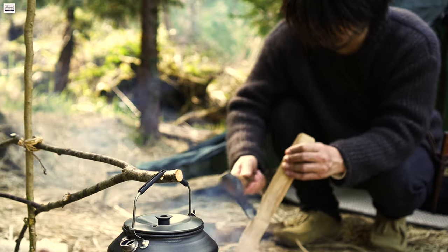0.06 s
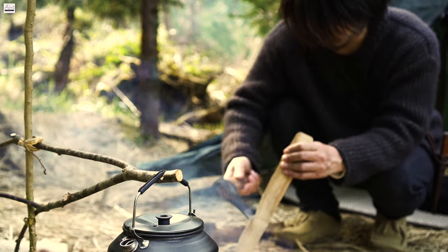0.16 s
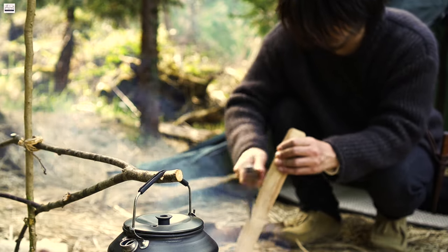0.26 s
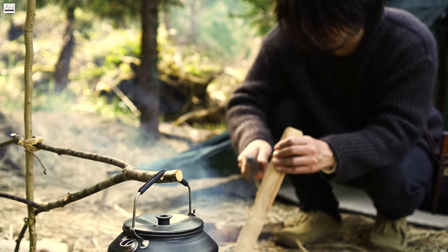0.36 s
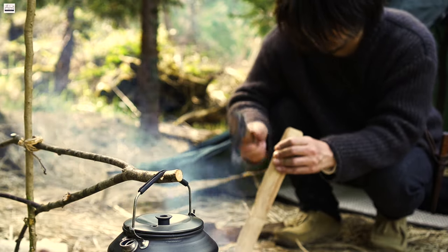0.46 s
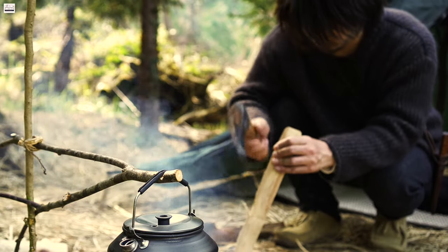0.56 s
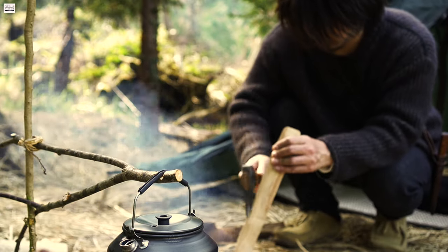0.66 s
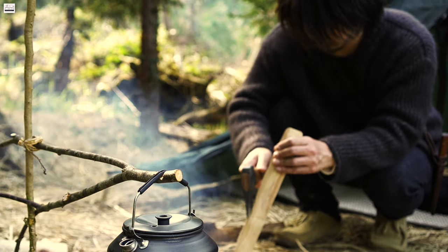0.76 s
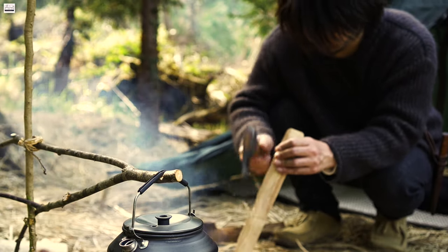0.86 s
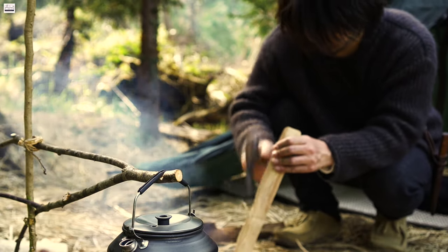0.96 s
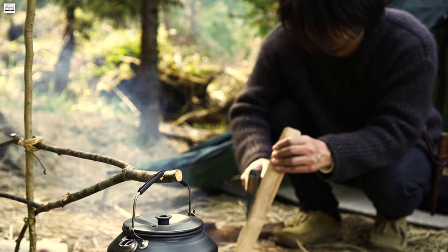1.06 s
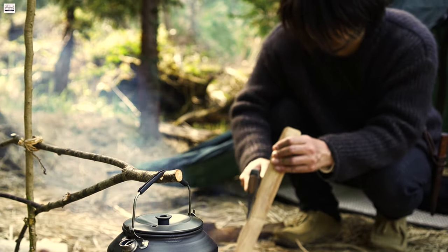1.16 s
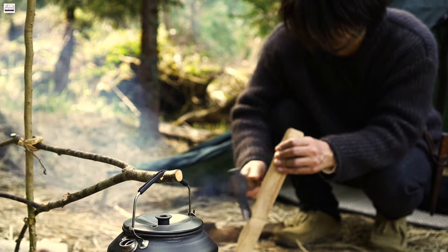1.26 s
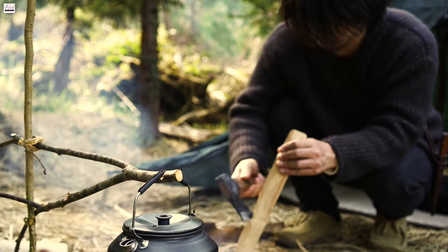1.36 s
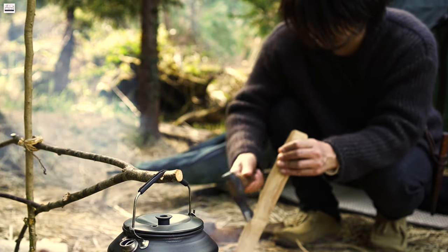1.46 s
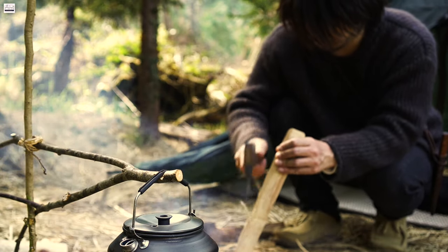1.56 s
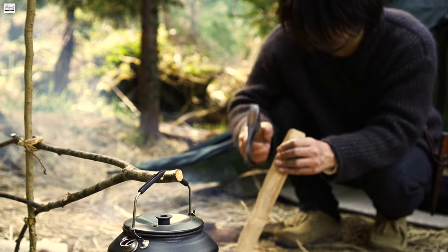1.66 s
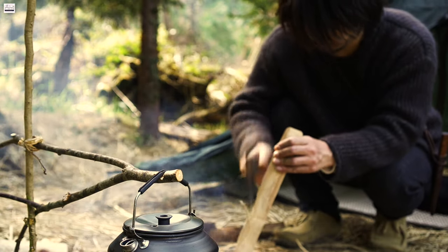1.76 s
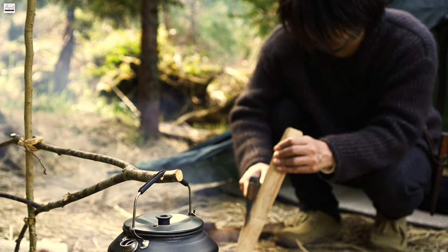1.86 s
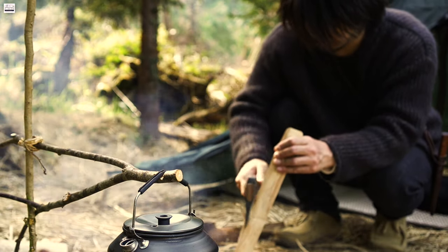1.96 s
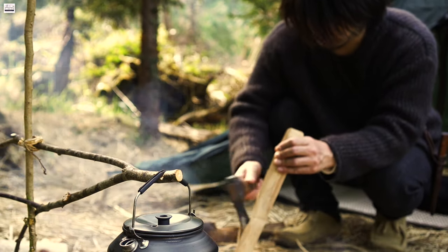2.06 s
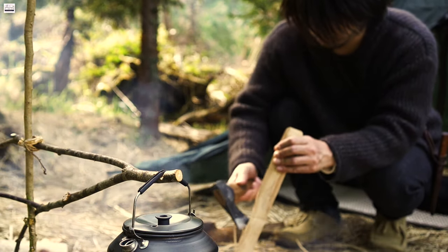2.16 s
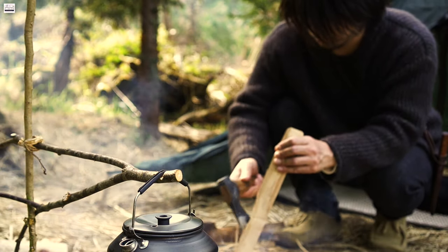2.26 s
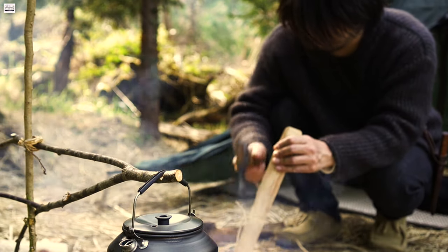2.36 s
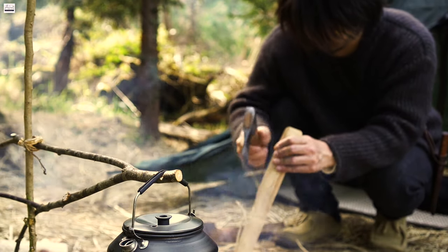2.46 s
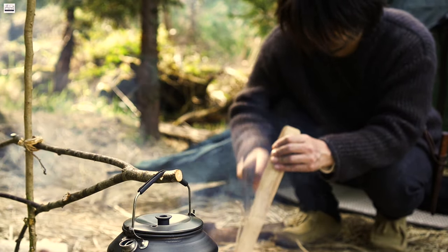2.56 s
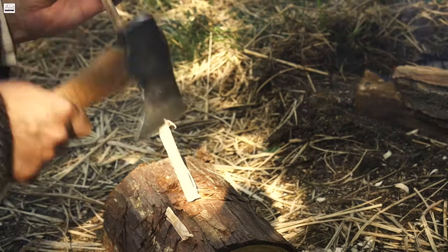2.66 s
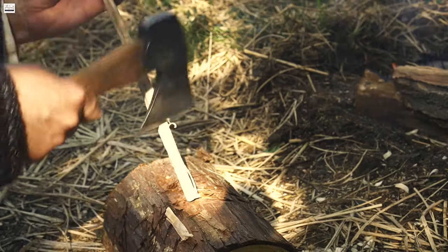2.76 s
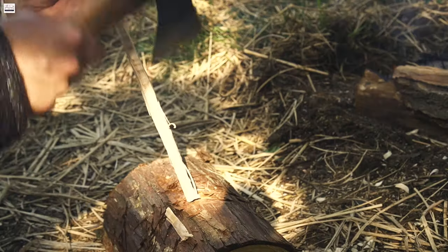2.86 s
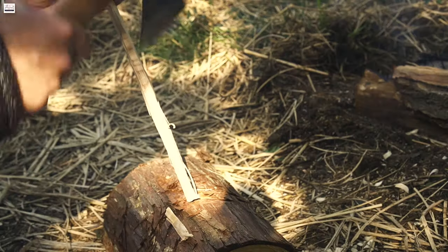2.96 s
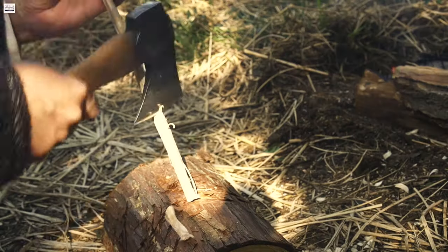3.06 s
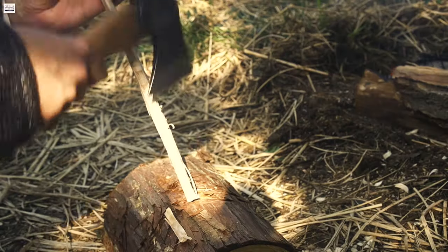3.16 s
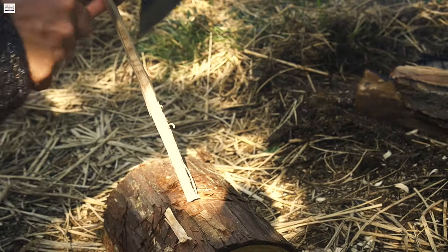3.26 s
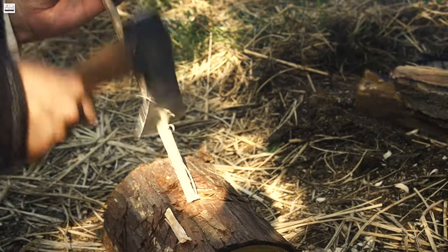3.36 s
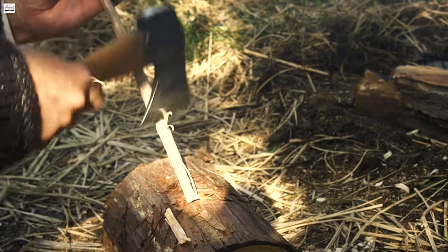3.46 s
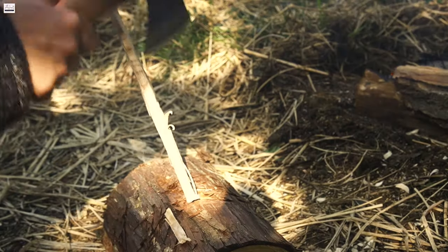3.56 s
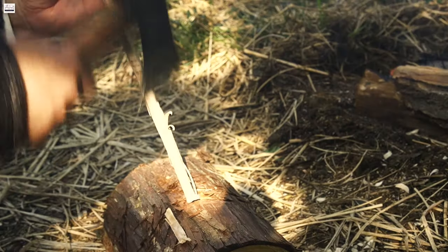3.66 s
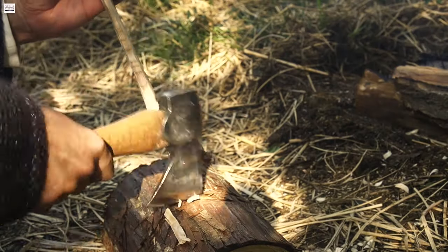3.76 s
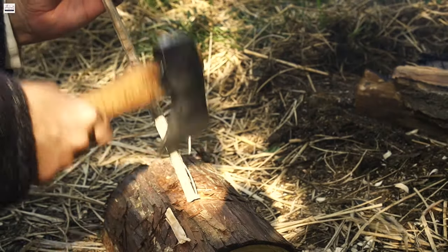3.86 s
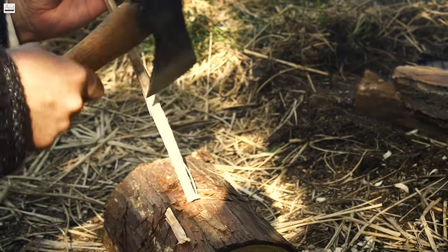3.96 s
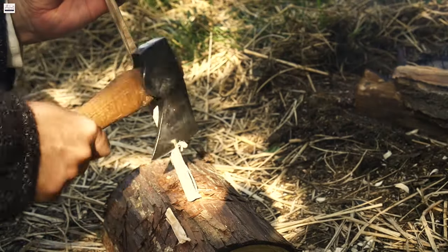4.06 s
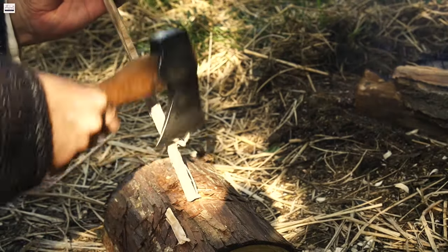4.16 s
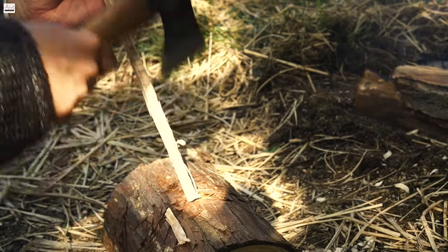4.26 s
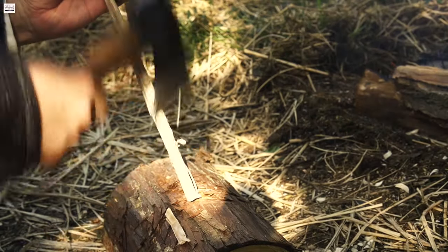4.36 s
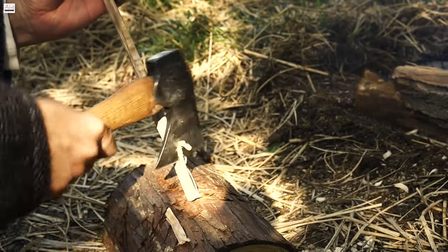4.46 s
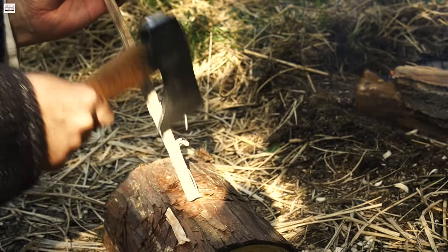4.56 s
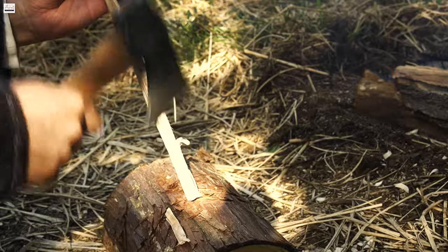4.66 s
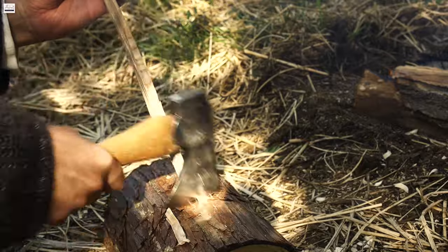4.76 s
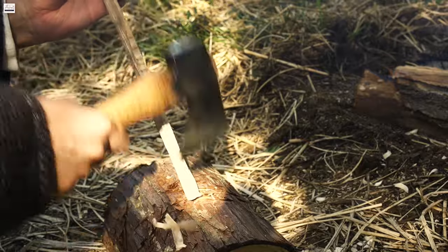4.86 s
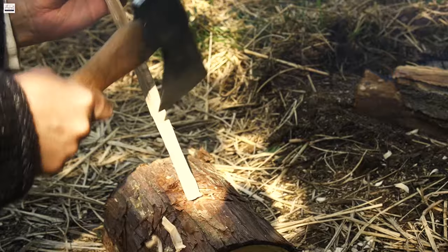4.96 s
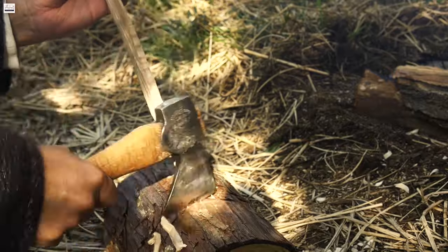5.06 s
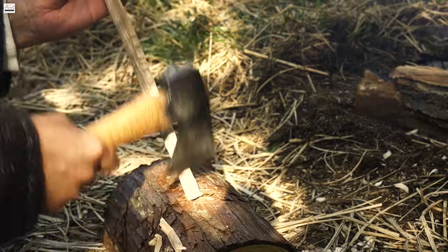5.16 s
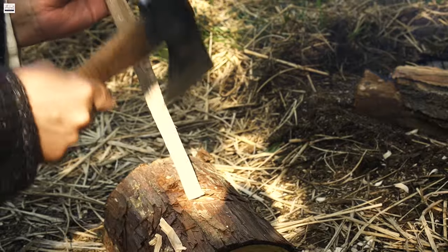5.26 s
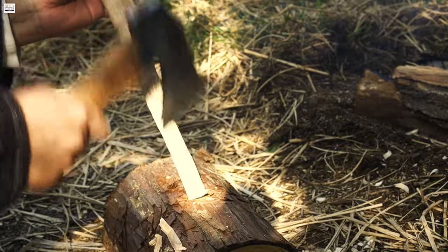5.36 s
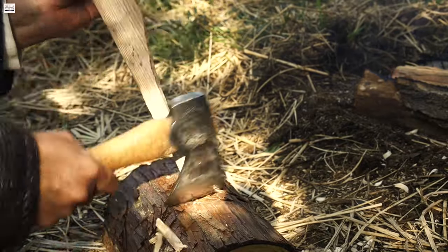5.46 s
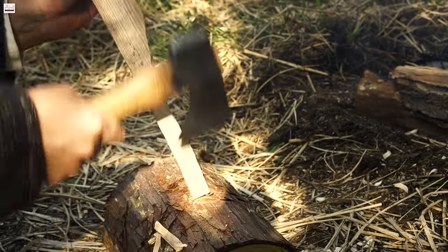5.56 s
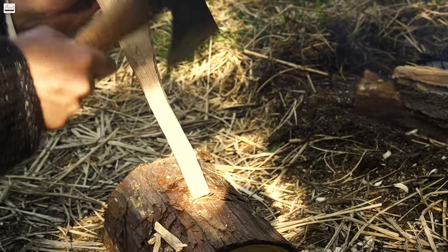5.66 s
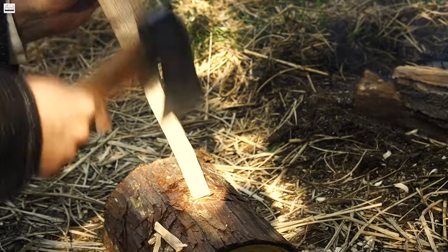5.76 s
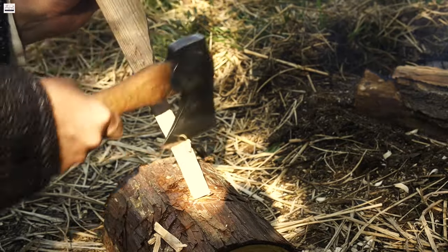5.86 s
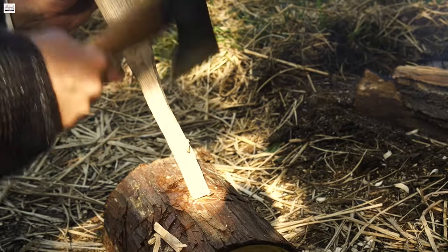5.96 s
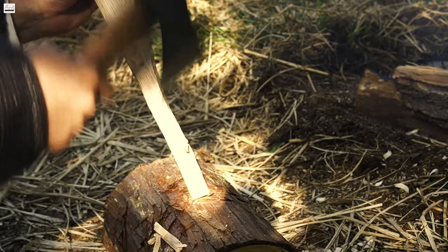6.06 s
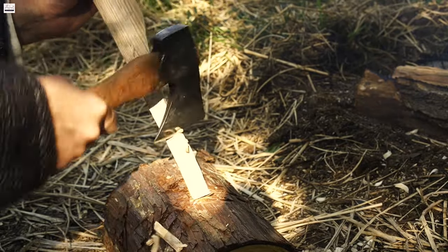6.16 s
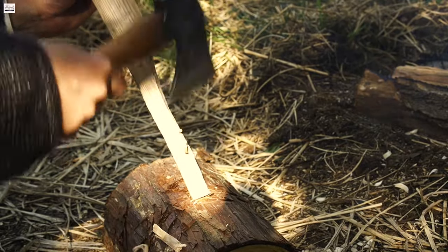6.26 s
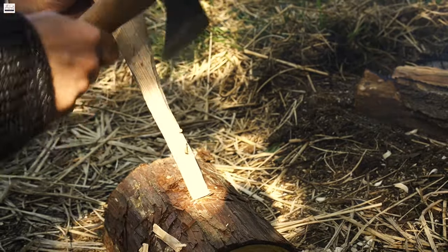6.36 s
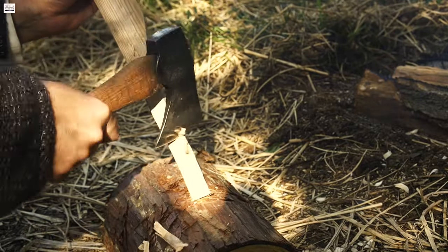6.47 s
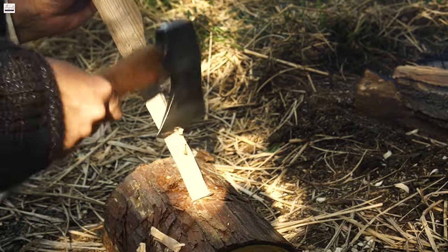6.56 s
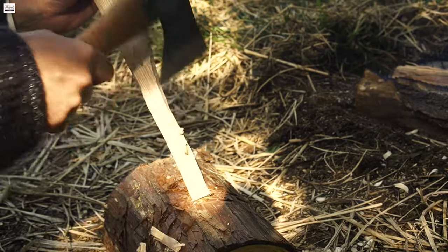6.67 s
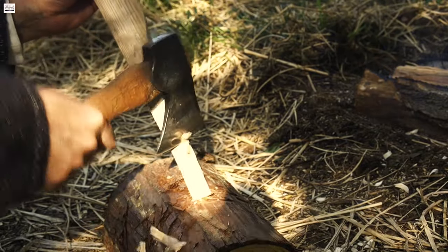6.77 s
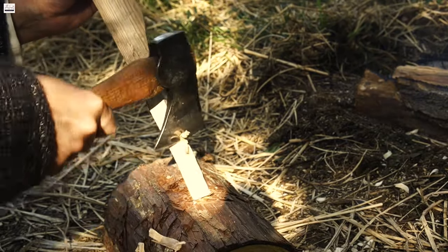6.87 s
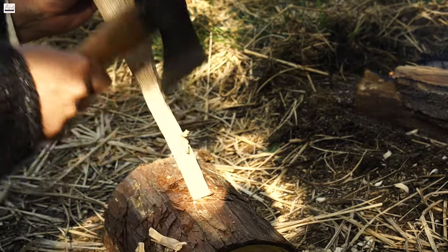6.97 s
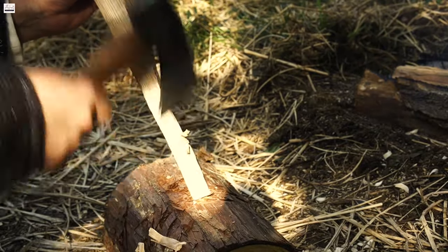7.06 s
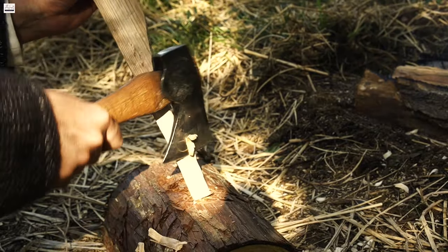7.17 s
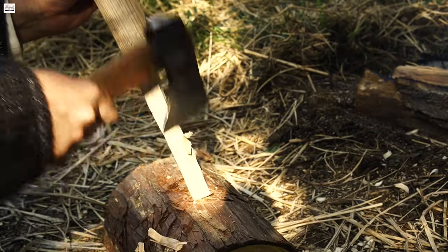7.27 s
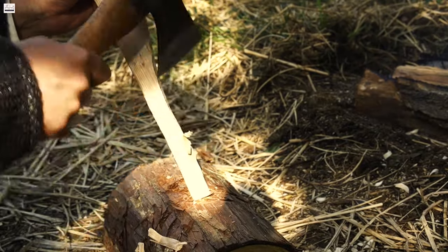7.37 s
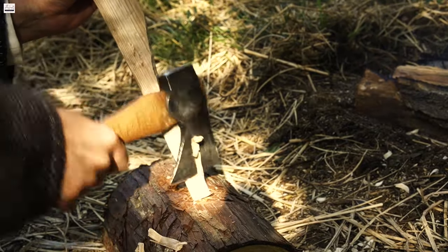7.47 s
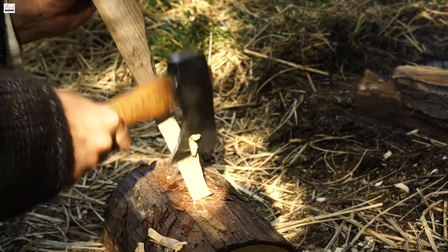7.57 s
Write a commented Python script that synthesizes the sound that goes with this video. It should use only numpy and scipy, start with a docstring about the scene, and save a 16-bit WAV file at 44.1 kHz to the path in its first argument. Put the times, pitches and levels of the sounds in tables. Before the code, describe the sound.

Dry, gritty hatchet blows on wood, with a brief dull steel edge and hollow knocks that die at once. Three main strikes are spaced over the first two seconds; after a cut to a nearer microphone, a steady run continues to the end, the loudest slightly clipped. Bassy log thuds and soil rumble follow the hits. Beneath lie faint hiss, kettle simmer, low fire and tiny ticks, with only a slight outdoor echo.

```python
"""Shaving wood with a hatchet in a forest camp

A hatchet shaves a wooden blank that stands on a log: each blow is gritty noise for cracks and tearing fibre,
short steel modes and a choked knock. The log thuds in damped sines; a later wave runs through the soil to the
microphone stand. Straw, sleeves, chips, a scattered echo and a simmering kettle by a low fire are shaped noise
and tones. About a third of the way in the microphone moves closer; the loudest blows clip."""
import sys
import numpy as np
from scipy import signal
from scipy.fft import rfft, irfft, next_fast_len
from scipy.io import wavfile
from scipy.ndimage import map_coordinates

SR = 44100
rng = np.random.default_rng(int(sys.argv[2]) if len(sys.argv) > 2 else 0)


def unload_audio(sound):
    """Save the sound as a 16-bit wav file, at the path given as the first command line argument."""
    columns = np.transpose(np.atleast_2d(sound))
    # keep every value between -1 and 1, then stretch to whole-number steps
    steps = np.round(np.clip(columns, -1, 1) * 32767)
    wavfile.write(sys.argv[1], SR, steps.astype(np.int16))


def volts(x):
    """Linear amplitude factor 10**(x/20) for a level x in dB, scalar or array-like."""
    e = np.asarray(x, float) / 20
    return 10 ** e


N = 336042  # length in samples
MOVE_S = 2.67  # the microphone moves closer

# sharp contacts of blade, fibres and chips:
# (time [s], relative level [dB], brightness [dB], t60 of the main burst [s])
CRACKS = [(0.016, -13.5, 16, 0.024), (0.0612, -29, 0, 0.0091), (0.1731, -18.5, 6, 0.0097),
          (0.1815, -16, 18, 0.033), (0.2192, -14.5, 12, 0.0076), (0.3905, -15, -11, 0.016),
          (0.5245, -36, 5.5, .015), (0.7222, -14, -4, 0.033), (0.7376, 5, -12, 0.0098),
          (.861, -35, -7, 0.022), (1.0752, 16.5, -6.5, 0.0071), (1.0864, 5, -14, .008),
          (1.3196, -23, 6.5, 0.023), (1.3774, -29.5, 5, 0.013), (1.8683, 8, -6.5, 0.0081),
          (1.8731, 8.5, -7, 0.012), (2.1, -31.5, -11, 0.016), (2.1174, -24, -5, 0.026),
          (2.1303, -29, 5, 0.03), (2.1412, -25.5, 5, 0.013), (2.166, -18, -0.5, 0.022),
          (2.1858, -24, 0.5, 0.031), (2.218, -27, 7.5, 0.0069), (2.2468, -21.5, 15, 0.012),
          (2.6708, -5.5, -6.5, 0.017), (2.7377, -11.5, 4, 0.062), (3.1027, 3.5, 6, 0.02),
          (3.148, -28.5, 3, .012), (3.2254, -25, 5.5, 0.028), (3.434, -2.8, 0, 0.022),
          (3.4474, -5.5, 2, 0.036), (3.7713, 1.5, -4.5, 0.014), (3.8017, -13.5, -3, 0.02),
          (3.818, -10.5, -2, 0.0088), (3.8645, -28, 1.5, 0.028), (3.9645, -31, 12.5, 0.021),
          (4.076, -31, 15, 0.007), (4.1152, 2.5, -10.5, 0.02), (4.1854, -33, -4, 0.019),
          (4.2477, -36, -3.5, 0.063), (4.4716, 0, -25, 0.015), (4.5305, -34, -1, .019),
          (4.6378, -31, -8.5, 0.013), (4.7756, -5, 2.5, .01), (4.7943, -16, 5, 0.024),
          (4.8176, -10.5, 1.5, 0.022), (4.8468, -22.5, 5.5, 0.05), (4.8643, -15.5, -3.5, 0.025),
          (4.8978, -27.5, 1, 0.0074), (4.981, -38, 1, .012), (5.007, -34.5, -8.5, 0.0092),
          (5.098, -37, 4, 0.0085), (5.1196, 4.5, -16.5, 0.0096), (5.1433, -1, 4, 0.017),
          (5.1948, -34, 6.5, 0.0098), (5.4257, -25, -0.5, 0.0086), (5.4841, -2, -6, 0.0094),
          (5.4933, -20, -12, 0.054), (5.5168, -4, 6.5, 0.013), (5.562, -32, 0, .012),
          (5.8536, -4, -7.5, 0.0073), (5.863, -6.5, -3, 0.024), (5.895, -21.5, -4.5, .014),
          (6.0479, -28.5, 14, .013), (6.1849, -4.5, -1.5, .016), (6.227, -22, -4, 0.0046),
          (6.5255, 1.9, 8, 0.025), (6.534, -16, 3.5, 0.013), (6.5703, -31.5, -6, .012),
          (6.851, 4.5, -11.5, 0.0092), (7.1704, 3.5, -5.5, .013), (7.1801, 0.6, 7.5, 0.011),
          (7.4942, -34, 22.5, .013), (7.5205, 0, -4.5, 0.019), (7.5412, -19.5, 7, 0.016),
          (7.5482, -22.5, 1, 0.033)]
# resonances of the damped steel head: (frequency [Hz], width [Hz], relative level [dB])
STEEL_MODES = [(2600, 170, 3.5), (3540, 260, 5.5), (4513, 190, 7.5), (7560, 110, -4.5), (8320, 170, -1.5)]


def unit(x):
    """Scales a signal to rms 1."""
    return x / np.sqrt(np.mean(x ** 2) + 1e-20)


def along(points, hz):
    """Interpolates (frequency, value) points on a log frequency axis."""
    f, v = np.transpose(points)
    return np.interp(np.log(hz + 1), np.log(f + 1), v)


def wobble(rate):
    """A smooth random curve with rate knots a second."""
    knots = rng.standard_normal(int(N * rate / SR) + 4)
    return map_coordinates(knots, [np.arange(N) * rate / SR])


def filtered(x, response):
    """Multiplies the spectrum of x by a complex response of frequency."""
    m = 2 * next_fast_len(N // 2 + SR // 4)  # padded, so that tails do not wrap round
    return irfft(rfft(x, m) * response(np.fft.rfftfreq(m, 1 / SR)), m)[..., :N]


def noise(spectrum):
    """Noise of rms 1, coloured by (frequency [Hz], relative level [dB]) points."""
    return unit(filtered(rng.standard_normal(N), lambda hz: volts(along(spectrum, hz))))


def add(track, s, sound):
    """Mixes a sound into a track from time s."""
    part = track[max(round(s * SR), 0):][:len(sound)]
    part += sound[:len(part)]


def ring(hz, t60, rise):
    """A damped sine with a soft start."""
    t = np.arange(SR // 2) / SR
    return volts(-60 * t / t60) * (1 - np.exp(-t / rise)) * np.sin(2 * np.pi * hz * t)


def causal(gain):
    """The minimum-phase response with these gains: it starts only after its excitation."""
    cepstrum = irfft(np.log(gain + 1e-6))
    half = len(cepstrum) // 2
    fold = np.r_[1, 2 * np.ones(half - 1), 1, np.zeros(half - 1)]
    return np.exp(rfft(cepstrum * fold))


def struck(s):
    """The time of the crack nearest to s."""
    return min((row[0] for row in CRACKS), key=lambda crack: abs(crack - s))


def hardness(db):
    """0 for a light contact, 1 for a hard blow."""
    return np.clip((db + 22) / 12, 0, 1)


def band_shares(db, bright_db):
    """Shares of a crack in three bands, about 0-4, 4-6 and over 6 kHz; hard blows are duller on top."""
    hard_top_db, light_top_db = -4.5, 0  # top band against the middle one
    top_db = light_top_db + hardness(db) * (hard_top_db - light_top_db)
    shares = volts([0, bright_db, bright_db + top_db])
    return shares / np.linalg.norm(shares)


def blade():
    """Blows and tearing are gritty noise through wood fibre and the damped steel head; light contacts are chips."""
    # the blade tears along the grain, from the crack nearest the start:
    # (start [s], end [s], relative level at the start [dB])
    cuts = [(1.078, 1.115, -32), (1.871, 1.893, -20), (2.755, 2.765, -27.5), (3.1, 3.112, -10),
            (3.429, 3.465, -13.5), (3.781, 3.799, -14), (4.124, 4.136, -11.5), (4.487, 4.496, -18.5),
            (4.776, 4.86, -24.5), (5.121, 5.146, -16.5), (5.477, 5.526, -12.5), (5.85, 5.902, -19),
            (6.18, 6.196, -10.5), (6.523, 6.537, -7), (6.851, 6.862, -14), (7.179, 7.192, -19),
            (7.523, 7.562, -23)]
    # colour of wood fibre: (frequency [Hz], relative level [dB])
    fibre = [(500, -21), (1300, -6), (2500, -2), (5000, -6), (9000, -13), (11500, -26.5), (16000, -63.5)]
    # colour of light chips: (frequency [Hz], relative level [dB])
    chip = [(1500, -19), (2200, -14), (2700, -2), (3500, -6.5), (6000, -8.5), (9000, -8.5), (12000, -18.5),
            (16000, -37)]
    cut_fade_db = 10  # lost as the blade slows in the wood
    loud = np.zeros((2, 3, N))  # envelopes: hard or light, then band
    t = np.arange(SR // 10) / SR

    for s, db, bright_db, t60 in CRACKS:
        main = volts(-60 * t / t60)
        splinters = volts(-21.5 - 60 * t / 0.0081)
        burst = (main + splinters) * (1 - np.exp(-t / 0.00027))
        hard = hardness(db)
        for band, share in enumerate(band_shares(db, bright_db)):
            add(loud[0, band], s, hard * share * volts(db + 4) * burst)
            add(loud[1, band], s, (1 - hard) * share * volts(db + 3) * burst)

    for start, end, db in cuts:
        s = struck(start)  # tearing begins with its crack
        snags = 4.5 * wobble(130)[round(s * SR):round(end * SR)]  # the edge catches and slips
        tear = volts(snags + np.linspace(db, db - cut_fade_db, len(snags)))
        tear = np.append(tear, tear[-1] * volts(-60 * t / 0.0042))
        for row, share_db in zip(loud[0], (-3, -1, 1)):
            add(row, s, volts(share_db) * tear)

    grit = volts(3.5 * wobble(900)) * rng.standard_normal((2, 3, N))  # fibres part in uneven slips

    def steel(f):
        return sum(volts(db) * 1j * f * w / (c * c - f * f + 1j * f * w) for c, w, db in STEEL_MODES)

    def edge(f, hz):
        return 1 / (1 + (f / hz) ** 10)

    def bands(f):
        return np.array([edge(f, 3620), edge(f, 5800) - edge(f, 4000), 1 - edge(f, 5900)])

    def colour(f):
        return np.array([volts(along(fibre, f) + 7) + steel(f), volts(along(chip, f) + 14.5)])

    return filtered(loud * grit, lambda f: bands(f) * colour(f)[:, None]).sum((0, 1))


def pings():
    """A hard blow rings the modes of the steel head briefly, each in the share of its band."""
    out = np.zeros(N)
    chances = rng.standard_normal((len(CRACKS), len(STEEL_MODES)))
    for (s, db, bright_db, _), chance in zip(CRACKS, chances):
        low, mid, top = hardness(db) * band_shares(db, bright_db)
        for (hz, width, mode_db), share, c in zip(STEEL_MODES, (low, low, mid, top, top), chance):
            ping = ring(hz, 0.88 / width, 0.00078)[:SR // 10]
            add(out, s, share * volts(db + mode_db - 13.5 + 2 * c) * ping)
    return out


def blank():
    """A knock swells, rings and is choked by hand and blade; the first bite of the edge is more thump than ring."""
    # the blank rings at a pitch set by where the blade grips it:
    # (time [s], relative level [dB], pitch [Hz])
    knocks = [(0.3861, -18, 537), (.7231, -9, 997), (0.7405, -16, 875), (1.0732, -15, 979),
              (1.0864, -9, 860), (1.8678, -7, 906), (1.8729, -10, 790), (1.9133, -14.5, 776),
              (2.6734, -11, 904), (2.739, -17.5, 980), (2.7544, -16.5, 635), (3.1003, -2.1, 1021),
              (3.107, -7, 755), (3.4366, -3, 966), (3.4499, 4.5, 704), (3.4614, -11, 710),
              (3.7718, -4, 1134), (3.7797, -15.5, 970), (3.796, -20, 634), (4.1152, -5, 1120),
              (4.118, -6.5, 740), (4.126, -8.5, 722), (4.4699, -7.5, 1210), (4.4816, -12.5, 693),
              (4.7756, -4.5, 1206), (4.7938, -25, 665), (4.8181, -23.5, 685), (4.8641, -24, 1205),
              (5.1192, -11.5, 920), (5.1462, -4.5, 483), (5.171, -18.5, 343), (5.4808, -6.5, 1067),
              (5.5211, -14, 490), (5.8526, 2.5, 1090), (5.865, -17, 634), (5.8738, -19, 610),
              (5.8937, -23, 495), (6.1814, 0.5, 1196), (6.1862, -12, 620), (6.5234, 2.8, 1186),
              (6.5321, 3, 678), (6.8506, -7.5, 1120), (7.1716, -4.5, 1220), (7.1829, -2.5, 676),
              (7.5235, -7.5, 1185), (7.549, -27, 720)]
    # soft low taps: (time [s], relative level [dB], pitch [Hz])
    taps = [(0.638, -53.5, 245), (1.411, -48.5, 203), (1.989, -45, 153), (2.305, -49, 211)]
    # the dull body of a knock: (frequency [Hz], relative level [dB])
    dull_body = [(100, -26.5), (280, -2.5), (700, 0), (1500, 1.5), (2500, -25.5)]
    body_low_db = (2.5, -4)  # far and near: lift of the body towards the bass, halved at 450 Hz
    knock_t60_s, low_rings_longer = 0.013, 0.2  # at 800 Hz; power of the period
    tones, thump = np.zeros(N), np.zeros((2, N))  # thump: far, near
    t = np.arange(SR // 2) / SR

    for s, db, hz in knocks:
        t60 = knock_t60_s * (800 / hz) ** low_rings_longer
        choke = volts(-40 * (t / t60) ** 2)  # with the ring's own 20 dB this makes 60 dB at t60
        bite = np.clip((hz - 750) / 200, 0, 1)  # high knocks count as the first bite
        if abs(struck(s) - s) < 0.003:
            s = struck(s)  # knock and crack start together
        add(tones, s, volts(db + 4.5 - 5.4 * bite) * choke * ring(hz, 3 * t60, 0.00038))
        decay = volts(db - 11.0 + 11.25 * bite - 60 * t / (1.23 * t60))
        add(thump[int(s > MOVE_S)], s, decay * (1 - np.exp(-t / 0.0005)))
    for s, db, hz in taps:
        add(tones, s, volts(db + 20) * ring(hz, 0.022, 0.0014))

    def colour(hz):
        return [causal(volts(along(dull_body, hz) + 13.0 + low_db / (1 + (hz / 450) ** 4)))
                for low_db in body_low_db]

    rough_tones = tones * volts(4.0 * wobble(500))
    return rough_tones + filtered(thump * rng.standard_normal(N), colour).sum(axis=0)


def ground():
    """The log thuds first; the soil carries the blow more slowly in ringing low notes, with a rough rumble."""
    # blows that reach the log: (time [s], relative thud level [dB], relative soil wave level [dB])
    thuds = [(.386, -48, -45), (.736, -13.5, -24.5), (1.086, -16.5, -23.5), (1.877, -22.5, -32.5),
             (2.739, -25, -25.5), (3.101, -11, -14.5), (3.448, -14.5, -20.5), (3.773, -39, -28),
             (4.115, -30, -22), (4.471, -27, -26.5), (4.772, -33, -26), (5.142, -7.5, -11.5),
             (5.516, -9, -17.5), (5.853, -27.5, -22.5), (6.183, -11.5, -14.5), (6.522, -16, -17),
             (6.852, -17, -16), (7.17, -30, -23), (7.521, -33, -36.5)]
    # notes of the log: (frequency [Hz], relative level [dB], t60 [s])
    log_notes = [(83, 7, 0.03), (138, -2, 0.026), (259, -7, 0.054)]
    # two groups of soil notes, one reaching higher and shorter, one low and mostly longer ringing:
    # (frequency [Hz], relative level [dB], arrival after the blow [s], t60 [s])
    short_notes = [(81.5, 1.5, .036, 0.27), (62, 0, .042, 0.2), (145, -11.5, 0.022, 0.12),
                   (198.9, -8.5, 0.022, .15)]
    long_notes = [(55.5, 4.5, .04, 0.57), (65.34, -6, 0.074, 0.19), (73, -1.5, .0396, .45)]
    # loose soil shaking: (frequency [Hz], relative level [dB])
    rumble = [(40, -30.5), (80, 1.5), (200, -6.5), (400, -24), (800, -58)]
    # far and near: delay of the thud [s]; long soil notes against the short ones [dB]
    thud_delay_s, long_against_short_db = (0.0011, 0.0068), (0.7, -9.5)
    out, shake = np.zeros(N), np.zeros(N)
    t = np.arange(SR // 2) / SR
    for s, thud_db, short_db in thuds:
        near = int(s > MOVE_S)
        delay = thud_delay_s[near]
        long_db = short_db + long_against_short_db[near]
        for hz, db, t60 in log_notes:
            add(out, s + delay, volts(thud_db + db) * ring(hz, t60, 0.0015))
        for notes, group_db in ((short_notes, short_db), (long_notes, long_db)):
            for hz, db, arrival, t60 in notes:
                add(out, s + arrival, volts(group_db + db) * ring(hz, t60, 0.007))
        add(shake, s + delay, volts(short_db - 7.5 - 60 * t / 0.3) * (1 - np.exp(-t / 0.0063)))
    return out + shake * noise(rumble)


def swishes():
    """Grainy rubbing that swells and fades: straw and sleeves hiss, the steel edge rasps."""
    # shavings and sleeves swish: (start [s], end [s], relative level at the height [dB])
    rubs = [(0, 0.027, -29.5), (.85, 0.893, -54), (1.102, 1.276, -54.5), (1.298, 1.402, -44.5),
            (1.9, 2.063, -56), (2.081, 2.237, -44), (2.33, 2.422, -49.5), (2.769, 2.88, -53.5),
            (3.112, 3.274, -44.5), (3.49, 3.598, -45.5), (3.615, 3.793, -49), (3.792, 3.893, -43.5),
            (3.942, 4.03, -52), (4.188, 4.25, -50.5), (4.576, 4.643, -46), (5.13, 5.235, -41),
            (4.965, 5.037, -54), (5.301, 5.445, -51.5), (5.422, 5.533, -36), (6.204, 6.283, -45.5),
            (6.566, 6.596, -43), (6.633, 6.688, -44), (6.888, 6.924, -48.5), (7.24, 7.374, -51)]
    # the edge scuffs the wood as it is drawn back: (start [s], end [s], relative level at the height [dB])
    scuffs = [(2.085, 2.225, -46), (3.185, 3.24, -47), (3.52, 3.58, -50), (4.215, 4.265, -50),
              (4.6, 4.655, -53), (7.27, 7.33, -55)]
    # colours of the hiss and of the rasp: (frequency [Hz], relative level [dB])
    straw = [(880, -46), (1500, -16), (2180, -7.5), (2620, 0.5), (3780, -6), (7080, -12), (8500, -5.5),
             (15000, -35.5)]
    rasp = [(2000, -30), (2350, -4), (2700, 0), (3100, -7), (3500, -4), (3900, -25)]
    grains = unit(volts(4.5 * wobble(220) + 3 * wobble(40)))
    loud = np.zeros((2, N))
    for track, rows, sharpness in zip(loud, (rubs, scuffs), (1.5, 0.6)):
        for s, end, db in rows:
            hump = np.sin(np.linspace(0, np.pi, round((end - s) * SR))).clip(0) ** sharpness
            add(track, s, volts(db) * hump)
    return grains * (loud[0] * noise(straw) + loud[1] * noise(rasp))


def ticks():
    """Faint ticks of settling chips and embers, at random, each a rough ring at its own pitch."""
    out = np.zeros(N)
    for when, size, pitch in rng.random((round(11 * N / SR), 3)):  # 11 a second
        tick = ring(2500 * 3.8 ** pitch, 0.009, 0.0004)[:SR // 50]
        add(out, when * N / SR, volts(-50 + 12 * size) * tick)
    return out * wobble(2500)


def trees(x):
    """A scattered echo of x: noise that dies fast, with its own decay at each frequency."""
    # decay of the echo: (frequency [Hz], t60 [s])
    scatter = [(600, .03), (2500, 0.054), (12000, 0.11)]
    hz, t, z = signal.stft(rng.standard_normal(SR // 4), SR, nperseg=256)
    decay = volts(-60 * t / along(scatter, hz)[:, None])
    tail = signal.istft(z * decay, SR, nperseg=256)[1]
    return signal.fftconvolve(x, tail / np.linalg.norm(tail))[:N]


def camp():
    """Simmering kettle, low fire and the hiss of the air as shaped noise, with a wavering kettle tone."""
    # rows kettle, kettle tone, fire, air: (far level [dB], near level [dB], extra just after the move [dB])
    levels = [(-54, -51, 4.5), (-70.5, -55, 0.7), (-58.5, -58, 10.5), (-57, -56, 2.3)]
    # colours of kettle, fire and air: (frequency [Hz], relative level [dB])
    simmer = [(240, -38), (400, -9), (431, -9), (556, -7), (599, -8.5), (738, -7), (986, -4.5),
              (1110, -1.5), (1240, -11.5), (2000, -33), (2600, -59.5), (4400, -120)]
    embers = [(15, -44), (25, -3), (303, -7), (365, -11), (500, -13.5), (650, -38), (1100, -120)]
    hiss = [(880, -34), (1500, -9), (2650, -7), (4510, -12), (5800, -10.5), (7300, -12.5), (15200, -13),
            (15900, -7.5), (16400, -27)]
    since = np.arange(N) / SR - MOVE_S
    extra = np.exp(-abs(since) / 0.65)  # dies away after the move
    kettle_db, tone_db, fire_db, air_db = (
        np.where(since < 0, far, near + more * extra) for far, near, more in levels)
    tone_level = volts(tone_db + 3.2 * wobble(9.9))
    tone = tone_level * np.sin(2 * np.pi * np.cumsum(602 + 5 * wobble(1.3)) / SR)
    swell = volts(kettle_db + 1.2 * wobble(15))
    flicker = volts(fire_db + 2.2 * wobble(9))
    kettle, fire = swell * noise(simmer), flicker * noise(embers)
    air = volts(air_db + 0.56 * wobble(3.8)) * noise(hiss)
    return tone + kettle + fire + air


def scene():
    """All sources reach one microphone, the same on both channels."""
    chop = blade() + pings() + blank()
    echo = volts(-38) * trees(chop)
    return np.tile(chop + echo + ground() + swishes() + ticks() + camp(), (2, 1))


def band_limit(x):
    """A steep low-pass at the top of the band."""
    return signal.sosfilt(signal.butter(12, 16580, fs=SR, output="sos"), x)


def record(dry):
    """A low cut, clipping at full scale, a soft treble and a band limit; the channels differ by a faint hiss."""
    wet = filtered(dry, lambda hz: (1j * hz / (1j * hz + 30)) ** 3)
    wet = wet / (1 + abs(wet) ** 8) ** (1 / 8)  # clips with a slightly rounded knee
    apart = volts(-66.5) * rng.standard_normal(N)
    wet = filtered(wet, lambda hz: 1 / (1 + (hz / 17000) ** 4.9))
    wet = wet + apart * [[1], [-1]]  # opposite sign on the two channels
    wet = filtered(wet, lambda hz: 1 / (1 + (hz / 15900) ** 60))
    return band_limit(wet)


dry = scene()
out = record(dry)
unload_audio(out)
```